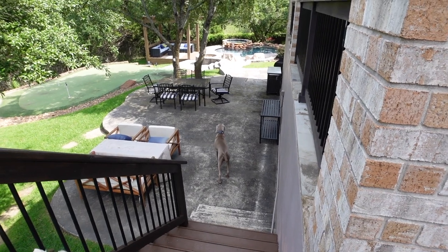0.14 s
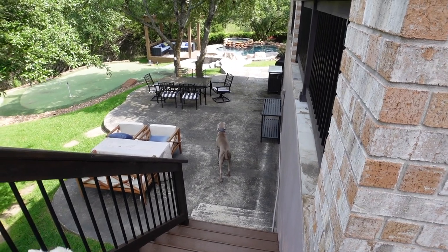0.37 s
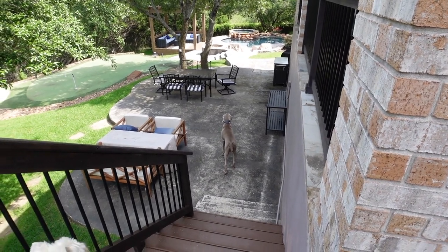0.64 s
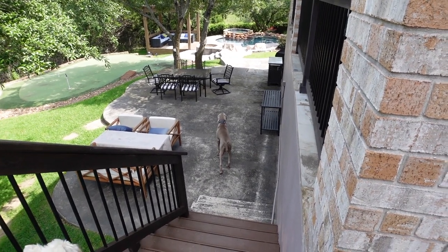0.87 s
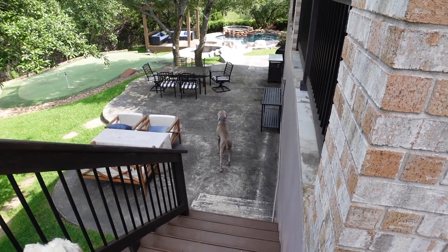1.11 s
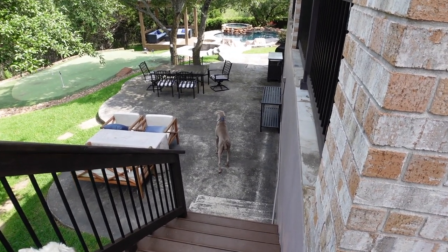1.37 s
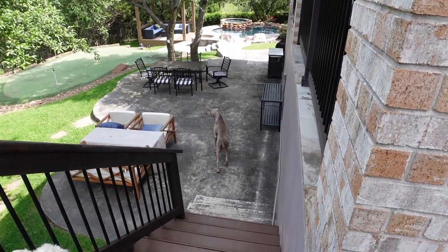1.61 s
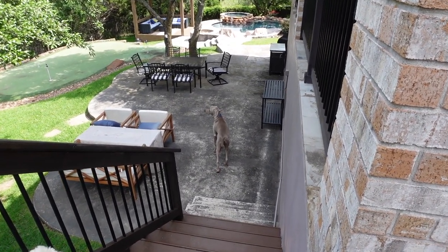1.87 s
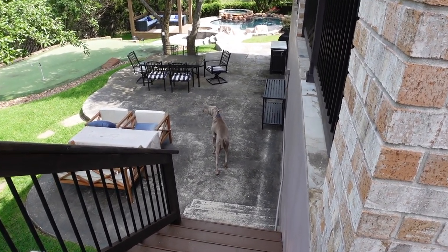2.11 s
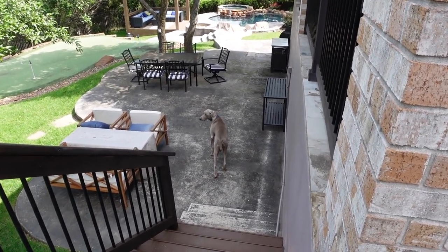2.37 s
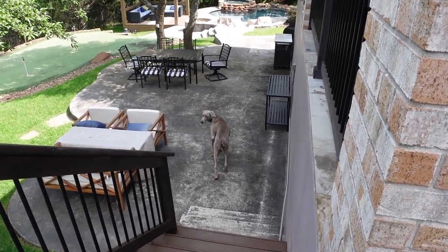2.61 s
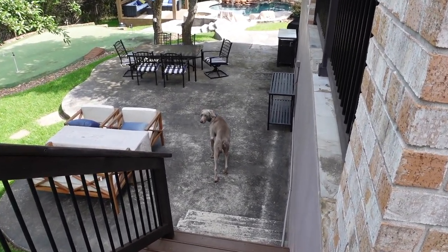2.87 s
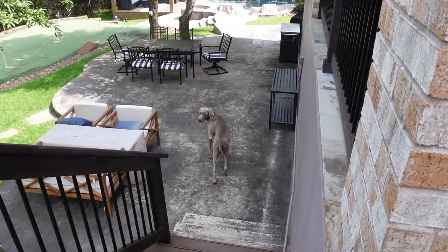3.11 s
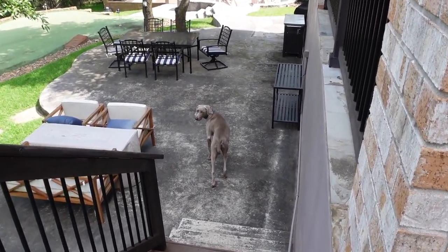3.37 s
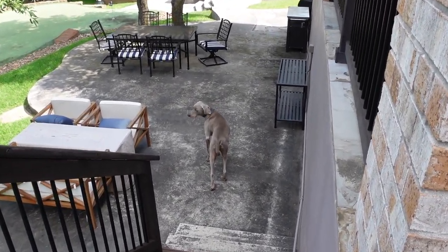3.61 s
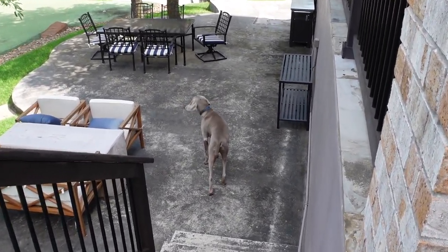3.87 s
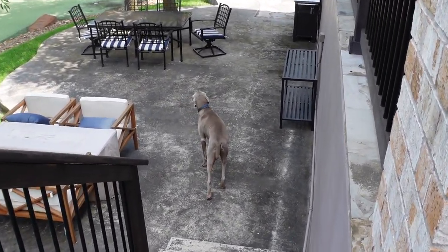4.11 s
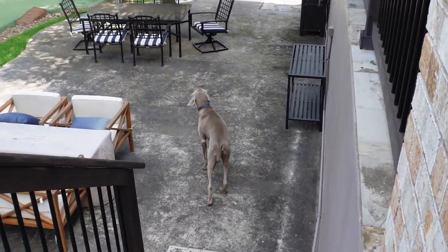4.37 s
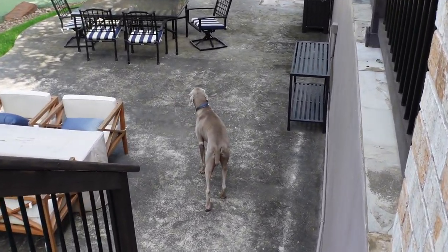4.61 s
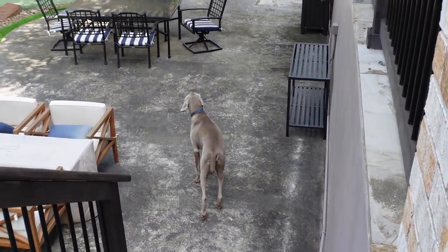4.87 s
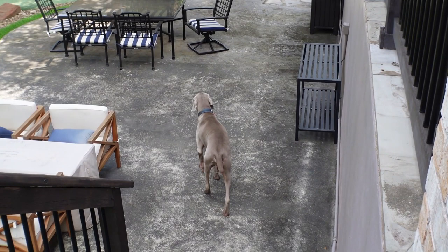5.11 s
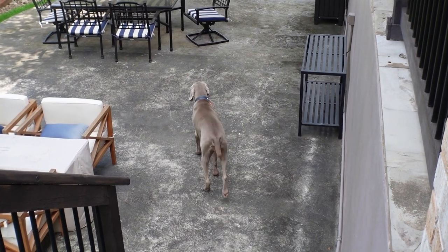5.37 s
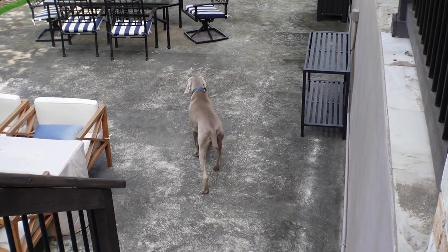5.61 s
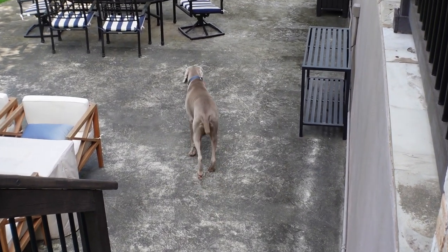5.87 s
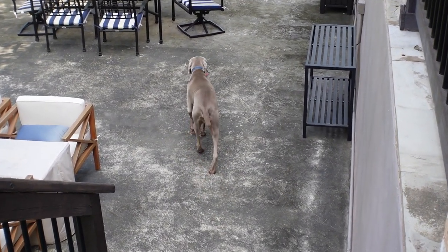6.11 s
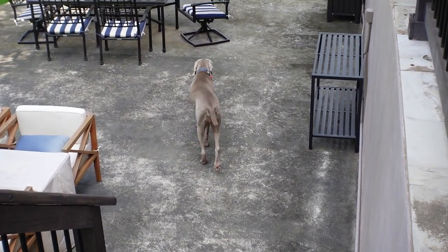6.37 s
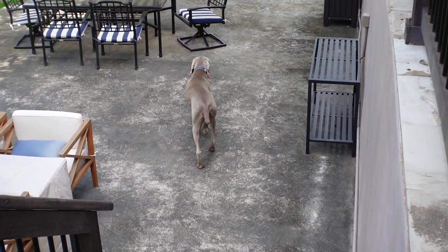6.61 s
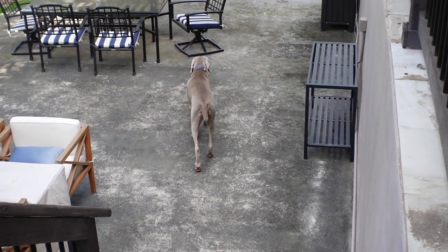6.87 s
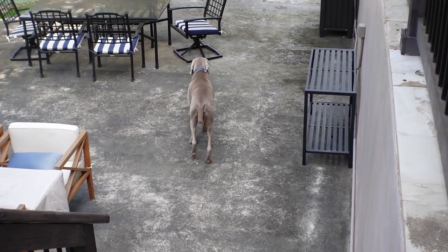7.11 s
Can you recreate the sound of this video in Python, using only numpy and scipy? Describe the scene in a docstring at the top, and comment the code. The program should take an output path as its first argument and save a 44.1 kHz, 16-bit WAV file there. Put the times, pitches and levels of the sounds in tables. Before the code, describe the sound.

Backyard water burbles and spatters steadily; early wind thumps and handling clicks give way to distant bird calls, quick chips and bright nearby whistles.

```python
"""Heard: a small waterfall trickling into a pool, gusts buffeting the microphone, a wind chime, clicks of a
hand-held camera's casing, one bird whistling close by, a second trilling, a third calling far away.
Water is patchy noise plus damped sines; wind is lumpy low noise plus single pushes; chime and casing are
decaying modes; birds are gliding tones with yard echoes. A far insect band and a traffic drone lie beneath."""
import sys
import numpy as np
from scipy import signal
from scipy.fft import rfft, irfft, next_fast_len
from scipy.io import wavfile
from scipy.ndimage import uniform_filter1d, map_coordinates

SR = 44100
rng = np.random.default_rng(int(sys.argv[2]) if len(sys.argv) > 2 else 0)


def to_wav(sig):
    """Store sig (one row per channel, or 1-D mono) as 16-bit WAV at the path in sys.argv[1].

    Samples outside -1..1 are clipped; the rate is SR.
    """
    pcm = np.clip(np.atleast_2d(sig), -1, 1) * 32767
    pcm = np.round(pcm).astype(np.int16)
    wavfile.write(sys.argv[1], SR, pcm.T)  # frames by channels


def invert_db(level):
    """Linear amplitude ratio for a level in decibels (20 dB per decade), elementwise."""
    return 10 ** (np.asarray(level, dtype=float) / 20)


N = 319284  # samples

# Far insect chorus. Each row: time in seconds, level in dB.
INSECT_LEVEL = [(0, -91), (.48, -57.5), (.8, -79), (1.2, -71), (1.59, -62), (2.64, -60), (3.42, -61.5),
                (3.6, -68), (4.0, -60), (4.6, -69), (5.02, -66), (5.22, -62.5), (6.23, -62), (7.24, -65)]
# Far traffic. Each row: time in seconds, level in dB.
TRAFFIC_LEVEL = [(0, -60.5), (.62, -70.5), (1.11, -71), (2.7, -71.5), (3.71, -69), (4.32, -73),
                 (5.49, -69.5), (6.77, -72), (7.24, -67)]
# Traffic spectrum. Each row: frequency in Hz, relative density in dB per Hz.
TRAFFIC_SPECTRUM = [(24, -58), (40, -50), (101, -23), (161, -7), (284, 6.5), (432, -2), (600, -5),
                    (780, -27), (1320, -120)]
# Water flow. Each row: time in seconds, gurgle level in dB, spray level in dB.
WATER_FLOW = [(0, -52.5, -57), (.5, -52.5, -55.5), (.68, -58.5, -59.5), (1.13, -59, -61), (2.3, -57, -58),
              (3.02, -57.5, -59), (3.57, -55, -61), (4.03, -57.5, -59.5), (5.12, -56, -58),
              (5.97, -58, -58.5), (7.02, -54.5, -58), (7.24, -53.5, -57.5)]
# Water spectra. Each row: frequency in Hz, relative density in dB per Hz.
GURGLE_SPECTRUM = [(240, -18), (400, -12), (556, -6.5), (731, 0), (951, 1.5), (1040, -2.5), (1590, -1),
                   (1960, -0.5), (2790, -1), (3750, -1), (4090, -8.5), (5500, -14), (7150, -19),
                   (12100, -120)]
SPRAY_SPECTRUM = [(2060, -18.5), (3500, 1), (3820, -10), (4170, -24), (4730, -2.5), (6510, -2), (8530, -7),
                  (9490, -8.5), (15700, -18.5)]
# Stereo width of the water. Each row: frequency in Hz, left-right correlation.
WATER_ALIKE = [(60, 0.32), (130, 1), (290, 0.33), (640, 0.58), (1410, 0.49), (3100, 0.31), (6820, 0.79),
               (15000, 0.47)]
# Clearest bubbles. Each row: start in seconds, level in dB, pitch in Hz.
CLEAR_BUBBLES = [(.0914, -35.5, 2310), (.4738, -35.5, 2850), (.9687, -41.5, 2320), (1.712, -43, 1380),
                 (1.9799, -40, 1915), (2.5576, -43, 2160), (2.7417, -43, 2010), (2.8105, -43, 1510),
                 (2.8374, -45, 1430), (3.2647, -37.5, 996), (4.0751, -44, 2300), (4.601, -47, 1450),
                 (4.6257, -37, 2800), (4.698, -44, 2400), (4.705, -46, 1510), (4.735, -44, 2450),
                 (4.745, -41, 2580), (4.8464, -40, 2250), (4.9257, -39, 2460), (4.9935, -43, 2470),
                 (5.0124, -45, 1410), (5.0853, -41, 2700), (5.113, -42, 2450), (5.152, -46, 2070),
                 (5.28, -42, 2850), (5.309, -45, 2750), (5.4605, -47, 2450), (6.0901, -41, 1380)]
# Loudest drops striking stone. Each row: start in seconds, level in dB, pitch in Hz.
LOUD_DROPS = [(.155, -47, 5800), (.183, -47, 6000), (.215, -43, 10500), (.2767, -41, 5100),
              (.3371, -34.5, 7450), (.413, -43, 5730), (.447, -33.5, 5900), (.4736, -36, 5670),
              (.508, -37, 5500), (.6, -41, 8100), (.637, -41, 6460), (1.09, -39.5, 6950),
              (1.202, -41.5, 6000), (1.3528, -37.5, 7900), (1.4122, -38, 6500), (1.8512, -39, 6090),
              (2.6915, -31.5, 9460), (2.7218, -43, 5900), (3.0337, -45, 6010), (3.8743, -40, 7000),
              (4.1162, -41, 5900), (4.257, -38.5, 5450), (4.343, -42, 6610), (4.7096, -38.5, 5940),
              (5.1517, -40, 6300), (5.248, -36, 6450), (5.6521, -39, 6540), (6.1514, -37, 5260),
              (6.8427, -41, 6447), (7.0067, -34, 5990)]
# Wind at the microphone ports. Each row: time in seconds, strength in dB.
WIND_STRENGTH = [(0, -56), (.1, -58), (.2, -55), (.25, -55), (.29, -64), (.36, -56), (.5, -58),
                 (.62, -51.5), (.78, -56), (.84, -64.5), (.97, -64), (1.03, -56), (1.13, -57), (1.2, -56),
                 (1.4, -71.5), (1.6, -64.5), (1.8, -72), (2.3, -85), (2.6, -94), (2.72, -66.5), (2.9, -81),
                 (3.48, -70), (3.57, -60), (3.72, -67.5), (4.15, -76.5), (4.25, -93), (6.6, -88.5),
                 (7.24, -79)]
# Eddies striking the ports. Each row: start in seconds, push in dB before the port filter, pitch in Hz,
# left-right difference in dB, surrounding flutter in dB.
EDDIES = [(0.022, -26.5, 260, -1, -53), (0.036, -26, 140, -1, -52), (.08, -32, 220, -2, -60),
          (0.165, -25.5, 170, -7, -54), (.21, -29, 150, -5, -55), (0.371, -30, 170, -1, -53),
          (.424, -25, 220, -2, -49.5), (0.459, -18, 170, -8, -51), (.533, -27, 240, -3, -53),
          (.547, -26, 200, -3, -57), (0.602, -20.5, 238, -3, -49), (.675, -14.5, 237, -4, -53),
          (.745, -18.5, 237, -1, -51), (.785, -30, 200, -3, -60), (.9, -33, 150, -3, -60),
          (1.011, -26, 230, 1, -52), (1.03, -31, 230, 2, -55), (1.068, -17.5, 225, -1, -54),
          (1.105, -18.5, 146, -4, -62), (1.144, -29.5, 190, -5, -63), (1.47, -46, 100, -2, -67),
          (1.59, -43, 100, 2, -59), (3.089, -37, 99, -3, -62), (3.592, -31, 180, -13, -53.5),
          (3.659, -39, 184, -20, -55.5)]
# Strong wind and light air. Each row: frequency in Hz, relative density in dB per Hz.
BUFFET_SPECTRUM = [(15, -57), (25, -26), (118, 0), (216, 0), (348, -8), (512, -26), (600, -34), (780, -50),
                   (1320, -120)]
BREEZE_SPECTRUM = [(15, -53), (25, -31), (62, -0.5), (172, -1), (292, -8), (399, -18.5), (500, -10.5),
                   (650, -40), (1100, -120)]
# Chime strikes. Each row: start in seconds, pitch in Hz, level in dB, t60 in seconds.
CHIME_STRIKES = [(0, 884, -70, 9), (0, 990, -71, 6), (2.1, 1110, -70, 14), (1.5, 884, -76, 10)]
# Casing clicks. Each row: start in seconds, level in dB, left-right difference in dB,
# softness in dB per octave (sign ignored).
CASING_CLICKS = [(0.0861, -33, -2, -1), (0.193, -22, -16, 28), (0.2677, -33, 3, 12), (0.338, -31, -7, -3),
                 (0.3708, -14.5, -8.5, 10.5), (2.6912, -34, 5, 14)]
# Casing modes. Each row: frequency in Hz, relative level in dB, t60 in seconds.
CASING_MODES = [(1760, -9, 0.013), (2400, -6, .004), (3100, -6, 0.012), (3250, 3, 0.0045),
                (3800, -1, 0.0045), (4400, 0, 0.003), (5100, -7, 0.003), (6700, -18, .004)]
# Far bird, held notes. Each row: start in seconds, length in seconds, level in dB, first pitch in Hz,
# held pitch in Hz.
FAR_HELD_NOTES = [(3.63, 0.13, -56, 3560, 3473), (4.062, 0.11, -57, 4010, 4015),
                  (4.353, 0.087, -57, 3500, 3950)]
# Far bird, falling notes. Each row: start in seconds, length in seconds, level in dB, first and last pitch in Hz.
FAR_FALLING_NOTES = [(1.92, 0.053, -60, 3720, 3320), (2.008, .035, -60, 3380, 3240),
                     (3.855, 0.03, -60, 4320, 4050), (3.882, 0.03, -59, 3630, 3300),
                     (4.152, 0.044, -53.5, 3900, 3420), (4.188, .044, -58, 3440, 2660),
                     (4.435, 0.056, -56, 3690, 2740)]
# Trill chips. Each row: start in seconds, level in dB, pitch in Hz.
TRILL_CHIPS = [(2.087, -50, 4300), (2.178, -49.5, 4250), (2.345, -57, 4200), (2.43, -53, 4150),
               (2.514, -53.5, 4120), (2.609, -51.5, 4170), (2.715, -48, 4186), (2.832, -53, 4180),
               (3.399, -55, 4250), (5.045, -52, 4310), (5.172, -50, 4380), (5.273, -50.5, 4150),
               (5.36, -50.5, 4190), (5.448, -50, 4120), (5.527, -48.5, 4200), (5.614, -45.5, 4220),
               (5.695, -44, 4170), (5.79, -44.5, 4210), (5.888, -54, 4250), (5.989, -44, 4200),
               (6.279, -50, 4180), (6.351, -49, 4190), (6.467, -49, 4180), (6.848, -51, 4180),
               (6.933, -51, 4180), (7.02, -49, 4180)]
# Note shapes. Each row: share of the length, pitch ratio, added level in dB.
CHIP_SHAPE = [(0, 1.015, -14), (.25, 1.01, -7), (.55, .995, -7), (.64, .94, -22), (.74, .905, -8),
              (1, 0.89, -15)]
RISE_SHAPE = [(0, 1.02, -7.5), (.1, 1.005, -6.5), (.25, .995, -1.5), (.4, 1.155, -4.5), (.6, 1.275, -7),
              (.9, 1.335, -2.5), (1, 1.36, -11)]
FALL_SHAPE = [(0, 1, -25), (.3, 0.95, -9.5), (.42, .91, 1), (.72, .66, -6.5), (1, 0.6063, -9)]
PIP_SHAPE = [(0, .93, -9), (.3, .965, -4.5), (.65, 1.005, 4), (1, 0.968, -11)]
LOW_SHAPE = [(0, .83, -11), (.3, .875, -2.5), (.65, .915, 1), (.85, 0.95, -1), (1, 0.97, 4)]
# Near bird's notes. Each row: start in seconds, length in seconds, level in dB, pitch in Hz.
NEAR_RISES = [(5.949, 0.18, -37.5, 3254), (6.496, 0.17, -34.5, 3219), (7.045, .17, -33.5, 3112)]
NEAR_FALLS = [(5.614, 0.042, -51.5, 4880), (6.17, 0.033, -32.5, 4880), (6.707, .042, -32.5, 4864)]
NEAR_PIPS = [(5.668, 0.054, -57, 2723), (6.225, 0.043, -43, 2755), (6.762, 0.04, -40.5, 2763)]
NEAR_LOWS = [(5.775, 0.13, -58, 2420), (6.308, 0.15, -53, 2400), (6.855, 0.125, -48.5, 2423)]


def unit(x):
    """Scaled to rms 1."""
    return x / np.sqrt(np.mean(x ** 2) + 1e-20)


def along(points, hz):
    """(Hz, value) points read on a log frequency axis."""
    point_hz, value = np.transpose(points)
    return np.interp(np.log(hz + 1), np.log(point_hz + 1), value)


def curves(rows):
    """One value per sample for each column after the time."""
    s, *columns = np.transpose(rows)
    return [np.interp(np.arange(N) / SR, s, column) for column in columns]


def wobble(rate_hz):
    """Smooth random curve, rate_hz knots a second."""
    knots = rng.standard_normal(int(N * rate_hz / SR) + 4)
    return map_coordinates(knots, [np.arange(N) * rate_hz / SR])


def filtered(x, response):
    """x shaped by a gain that depends on frequency."""
    m = next_fast_len(N + SR // 2)
    return irfft(rfft(x, m) * response(np.fft.rfftfreq(m, 1 / SR)), m)[..., :N]


def rush(spectrum, alike, patchy_db):
    """Stereo noise of rms 1 with time-frequency patches of random gain; alike sets left-right correlation."""
    z = signal.stft(rng.standard_normal((2, N)), nperseg=512)[2]
    patches = uniform_filter1d(rng.standard_normal(z.shape[1:]), size=6, axis=0)
    patches = uniform_filter1d(patches, size=8, axis=1)
    pair = signal.istft(z * invert_db(patchy_db * unit(patches)), nperseg=512)[1][:, :N]

    def mid_side_gain(hz):
        angle = np.arccos(np.clip(along(alike, hz), -1, 1)) / 2
        return invert_db(along(spectrum, hz)) * [np.cos(angle), np.sin(angle)]

    mid, side = filtered(pair, mid_side_gain)
    return unit(np.array([mid + side, mid - side]))


def grains(rows, cycles, rise, soft, size):
    """Damped sines from rows (s, dB, Hz, left-right dB); lifetime in cycles, pitch up by rise a lifetime for two."""
    s, db, hz, pan_db = np.transpose(rows)[:, :, None]
    age = np.arange(size) / SR * hz / cycles  # in lifetimes
    phase = 2 * np.pi * cycles * age * (1 + rise * np.minimum(age, 2) / 2)
    wave = np.sin(phase) * np.exp(-age) * (1 - np.exp(-age / soft))
    at = (np.round(s * SR).astype(int) + np.arange(size)).ravel()
    sides = [(invert_db(db + side * pan_db / 2) * wave).ravel() for side in (1, -1)]
    return np.array([np.bincount(at, x, N + size)[:N] for x in sides])


def shower(count, hz, spread, db, scatter_db, pan_db):
    """Random grain rows: log-normal pitch, a few large among many small."""
    u, g = rng.random((count, 2)), rng.standard_normal((count, 2))
    size_db = db - scatter_db * np.log(1 - .85 * u[:, 1])
    pitch_hz = np.clip(hz * np.exp(spread * g[:, 0]), 300, 14000)
    return np.c_[u[:, 0] * N / SR, size_db, pitch_hz, pan_db * g[:, 1]]


def bursts(rows, life_s):
    """Envelope of short puffs decaying over life_s, from rows that start (s, dB)."""
    s, db = np.transpose(rows)[:2]
    t = np.arange(SR // 20) / SR
    starts = np.bincount(np.round(s * SR).astype(int), invert_db(db), N + 1)
    puff = np.exp(-t / life_s) * (1 - np.exp(-t / 0.00014))
    return np.abs(signal.fftconvolve(starts, puff)[:N])


def shaped(shape, rows):
    """One (s, Hz, dB) table for each row (s, length, dB, Hz), all of the same shape."""
    return [[(s + share * length, hz * ratio, db + more_db) for share, ratio, more_db in shape]
            for s, length, db, hz in rows]


def whistle(notes, edge_s, glide_s, flutter_db):
    """Gliding tone for each (s, Hz, rms dB) table: ends faded over edge_s, corners rounded over glide_s."""
    out = np.zeros(N + SR)
    waver = 1 + 0.0039 * wobble(68.8)  # the pitch is never quite steady
    for note in notes:
        s, hz, db = np.transpose(note)
        t = np.arange(s[0], s[-1], 1 / SR)
        fade = np.clip(np.minimum(t - s[0], s[-1] - t) / edge_s, 0, 1)
        pitch_hz = uniform_filter1d(np.interp(t, s, hz), round(glide_s * SR), mode="nearest")
        pitch_hz = pitch_hz * waver[np.minimum((t * SR).astype(int), N - 1)]
        tone = np.sin(2 * np.pi * np.cumsum(pitch_hz) / SR)
        out[round(s[0] * SR):][:len(t)] += np.sqrt(2) * fade * invert_db(np.interp(t, s, db)) * tone
    return out[:N] * invert_db(flutter_db * wobble(90))  # moving air and leaves roughen the tone


def yard(x, pan_db, wall_s, wall_db, tail_db, t60_s):
    """Direct sound, dense echoes up to the farthest wall, a tail from the trees; moving leaves shimmer the echoes."""
    t = np.arange(SR) / SR
    noise = rng.standard_normal((2, 3, SR))
    walls, tail = noise[:, :1] + .5 * noise[:, 1:]  # partly shared by left and right
    walls = walls * (t > .002) * (1 + np.exp(-t / .012)) / (1 + np.exp((t - wall_s) / .004))
    tail = tail * invert_db(-60 * t / t60_s) * (1 - np.exp(-t / 0.01))
    echo = invert_db(wall_db) * walls / np.linalg.norm(walls[0]) + invert_db(tail_db) * tail / np.linalg.norm(tail[0])
    shimmer = invert_db(1.2 * wobble(70))
    echoes = shimmer * signal.fftconvolve(x[None], echo, axes=1)[:, :N]
    return (x + echoes) * invert_db([[pan_db / 2], [-pan_db / 2]])


def insects():
    """Far chorus blurred into a narrow band of noise."""
    level_db, = curves(INSECT_LEVEL)
    band = [(3800, -50), (4100, -6), (4300, 0), (4500, -6), (4800, -50)]  # (Hz, dB per Hz)
    return invert_db(level_db + 0.59 * wobble(21.03)) * rush(band, [(4300, 0.035)], patchy_db=-0.5)


def traffic():
    """Dull far-off drone of low noise, nearly mono."""
    level_db, = curves(TRAFFIC_LEVEL)
    return invert_db(level_db) * rush(TRAFFIC_SPECTRUM, [(100, 1.0), (290, 0.94)], patchy_db=-0.2)


def water():
    """Two layers of rush, with bubbles ringing in the pool and drops spattering on stone."""
    gurgle_db, spray_db = curves(WATER_FLOW)
    surge = wobble(5.7)

    def panned(rows, pan_db):
        return np.c_[rows, pan_db * rng.standard_normal((len(rows), 1))]

    gurgle = invert_db(gurgle_db + 1.0 * surge) * rush(GURGLE_SPECTRUM, WATER_ALIKE, patchy_db=2.0)
    spray = invert_db(spray_db + .5 * surge + 0.51 * wobble(12)) * rush(SPRAY_SPECTRUM, WATER_ALIKE, patchy_db=2.5)
    small_rows = shower(count=800, hz=2500, spread=.4, db=-60, scatter_db=5, pan_db=3.0)
    small = grains(small_rows, cycles=6.8, rise=0.11, soft=0.6, size=900)
    bubbles = grains(panned(CLEAR_BUBBLES, pan_db=-2.0), cycles=6.4, rise=0.036, soft=0.5, size=1800)
    drops = shower(count=1200, hz=6500, spread=0.229, db=-57, scatter_db=3.5, pan_db=6)
    rings = grains(drops, cycles=8.4, rise=0.045, soft=0.19, size=300)
    loud_rings = grains(panned(LOUD_DROPS, pan_db=7.0), cycles=7.2, rise=0.013, soft=0.36, size=400)
    puff_level = invert_db(-5) * bursts(drops, life_s=0.0026) + invert_db(-11.0) * bursts(LOUD_DROPS, life_s=0.0025)
    puffs = puff_level * rush(SPRAY_SPECTRUM, [(7000, 1.0)], patchy_db=2.5)
    return gurgle + spray + small + bubbles + rings + loud_rings + puffs


def wind():
    """Lumpy buffeting, partly shared by the ports, its spectrum set by strength, plus pushes of a cycle or so."""
    t = np.arange(0, N, 63) / SR
    wake_s = .02  # half width of the flutter around an eddy
    flutter = sum(invert_db(db) * np.exp(-((t - s) / wake_s) ** 2) for s, *_, db in EDDIES)
    wakes, = curves(np.c_[t, flutter])
    strength_db, = curves(WIND_STRENGTH)
    strength = invert_db(strength_db + 1.2 * wobble(13)) + wakes
    strong = np.clip((20 * np.log10(strength) + 61) / 12, 0, 1)  # 0 light air, 1 full buffet
    lumps = invert_db(0.91 * wobble(30.15) + 1.9 * np.array([wobble(25), wobble(25.18)]))
    buffet = rush(BUFFET_SPECTRUM, [(60, .6), (200, .25)], patchy_db=2.2)
    breeze = rush(BREEZE_SPECTRUM, [(100, 0.55)], patchy_db=1.5)
    air = strong * buffet + (1 - strong) * breeze
    pushes = grains(np.array(EDDIES)[:, :-1], cycles=0.48, rise=0.011, soft=0.9, size=2000)
    pushes = filtered(pushes, lambda hz: hz ** 2 / (hz ** 2 + 130 ** 2) / (1 + (hz / 480) ** 8))
    return strength * invert_db(np.c_[[-.9, .9]]) * unit(lumps * air) + pushes


def chime():
    """Each tube rings long; two close bending modes beat slowly, and the level wavers as it swings."""
    t = np.arange(N) / SR
    split_hz = 2.45

    def tube(age, hz):
        second = .6 * np.sin(2 * np.pi * (hz * age + split_hz * (age - .15)))
        return np.sin(2 * np.pi * hz * age) + second

    swing = invert_db(1.3 * wobble(6))
    ring = sum((t > s) * invert_db(db - 60 * (t - s) / t60) * tube(t - s, hz) for s, hz, db, t60 in CHIME_STRIKES)
    return ring * swing * invert_db([[.6], [-.6]])


def casing():
    """Every click in the hand rings the plastic shell briefly; soft ones ring mainly near the main mode."""
    main_mode_hz = 3080
    out, t = np.zeros((2, N + SR)), np.arange(SR // 20) / SR
    for s, db, pan_db, soft_db in CASING_CLICKS:
        ring = np.zeros(len(t))
        for hz, level_db, t60 in CASING_MODES:
            mode_db = level_db - abs(soft_db * np.log2(hz / main_mode_hz)) + rng.normal(0, 1)
            ring += invert_db(mode_db - 60 * t / t60) * np.sin(2 * np.pi * hz * t)
        attack = 1 - np.exp(-t / 0.0005)
        out[:, round(s * SR):][:, :len(t)] += invert_db(db + np.c_[[pan_db, -pan_db]] / 2) * ring * attack
    return out[:, :N]


def far_bird():
    """Held notes glided into, then climbing slightly as they fade; and falling notes."""
    scoop_s, climb, held_fade_db, fall_fade_db = 0.0292, 1.015, 5, 4
    calls = [[(s, a, db), (s + scoop_s, b, db), (s + length, b * climb, db - held_fade_db)]
             for s, length, db, a, b in FAR_HELD_NOTES]
    calls += [[(s, a, db), (s + length, b, db - fall_fade_db)] for s, length, db, a, b in FAR_FALLING_NOTES]
    tone = whistle(calls, edge_s=.008, glide_s=.01, flutter_db=1.8)
    return yard(tone, pan_db=4, wall_s=.07, wall_db=-6, tail_db=-4, t60_s=.7)


def trilling_bird():
    """Short chips, each a tone stepping down in pitch."""
    chip_s = .032
    chips = shaped(CHIP_SHAPE, [(s, chip_s, db, hz) for s, db, hz in TRILL_CHIPS])
    tone = whistle(chips, edge_s=.003, glide_s=.003, flutter_db=1.5)
    return yard(tone, pan_db=-.6, wall_s=.03, wall_db=-2, tail_db=-1, t60_s=.5)


def near_bird():
    """Phrases of falling, pip, low and rising tones; the low notes get a stronger echo tail."""
    song = shaped(RISE_SHAPE, NEAR_RISES) + shaped(FALL_SHAPE, NEAR_FALLS) + shaped(PIP_SHAPE, NEAR_PIPS)
    high = whistle(song, edge_s=.003, glide_s=.007, flutter_db=2.2)
    high = yard(high, pan_db=2.5, wall_s=.056, wall_db=-1.5, tail_db=-5, t60_s=.8)
    low = whistle(shaped(LOW_SHAPE, NEAR_LOWS), edge_s=.005, glide_s=.007, flutter_db=2.5)
    low = yard(low, pan_db=2.5, wall_s=.05, wall_db=-2, tail_db=-1.5, t60_s=.7)
    return high + low


def scene():
    """Sum of all sources in the yard."""
    background = insects() + traffic() + water() + wind() + chime() + casing()
    return background + far_bird() + trilling_bird() + near_bird()


def band_limit(x):
    """A steep low-pass at the top of the band."""
    return signal.sosfilt(signal.butter(12, 15830, fs=SR, output="sos"), x)


def record(dry):
    """The microphones cut the deepest bass, below about 45 Hz."""
    mix = filtered(dry, lambda hz: hz ** 2 / (hz ** 2 + 45 ** 2))
    return band_limit(mix)


dry = scene()
out = record(dry)
to_wav(out)
```